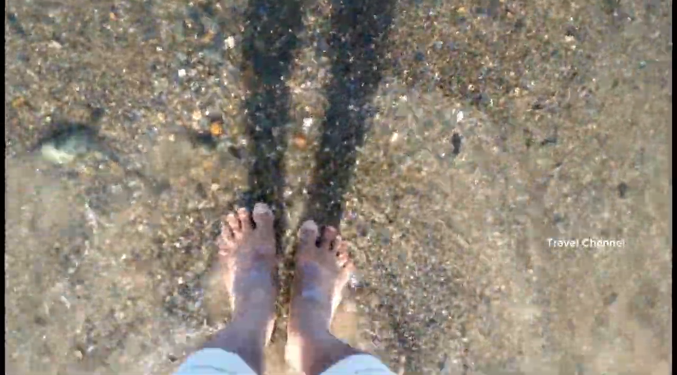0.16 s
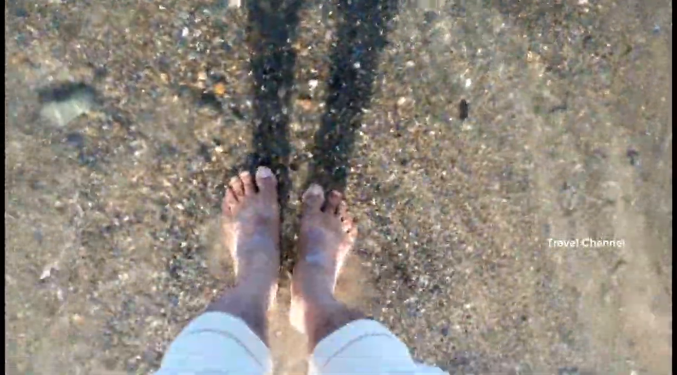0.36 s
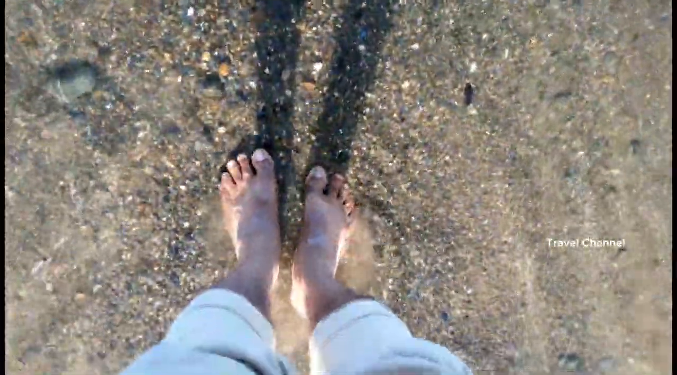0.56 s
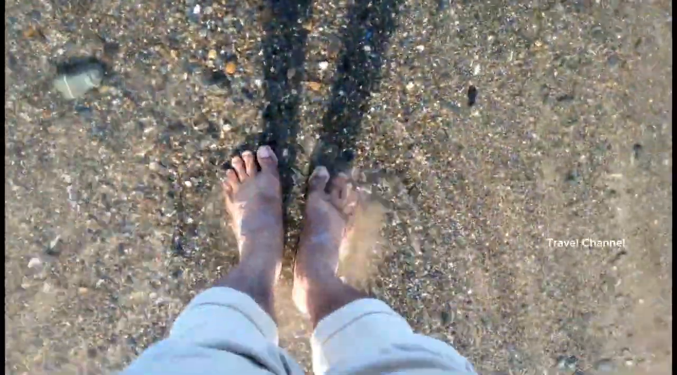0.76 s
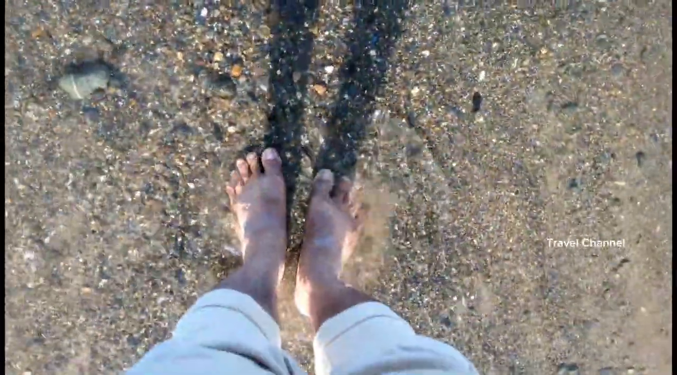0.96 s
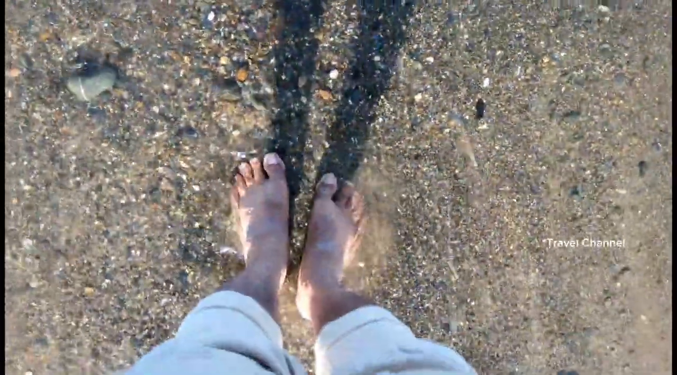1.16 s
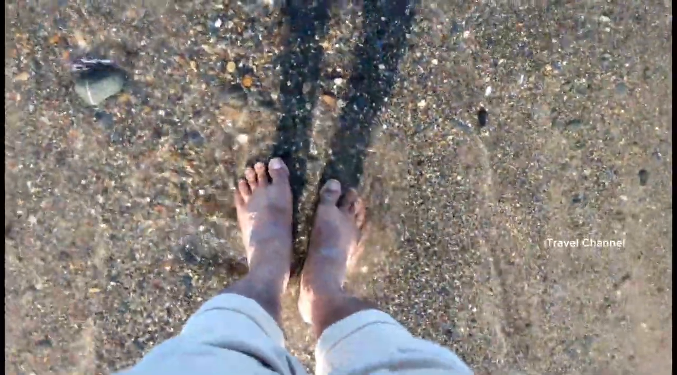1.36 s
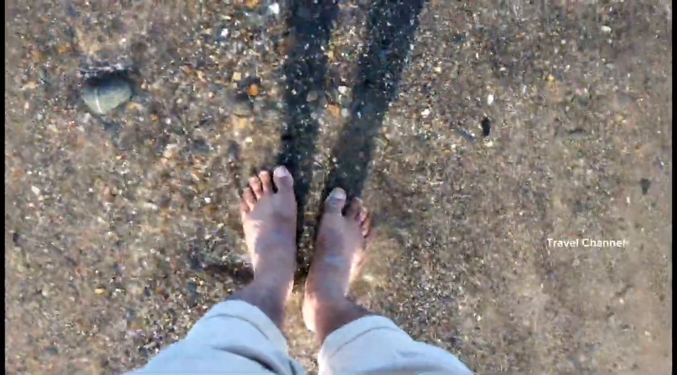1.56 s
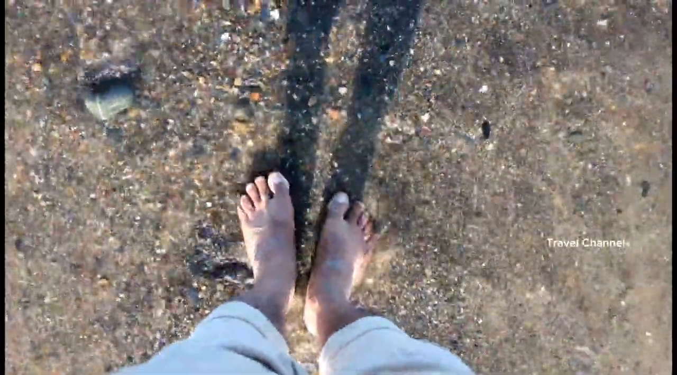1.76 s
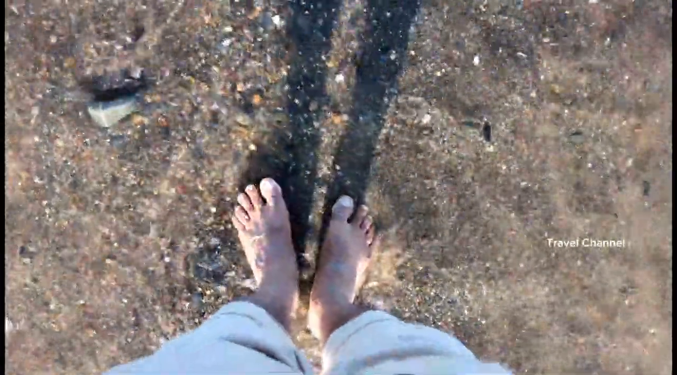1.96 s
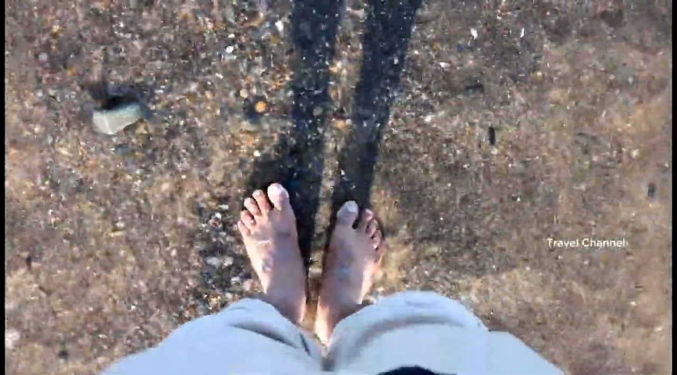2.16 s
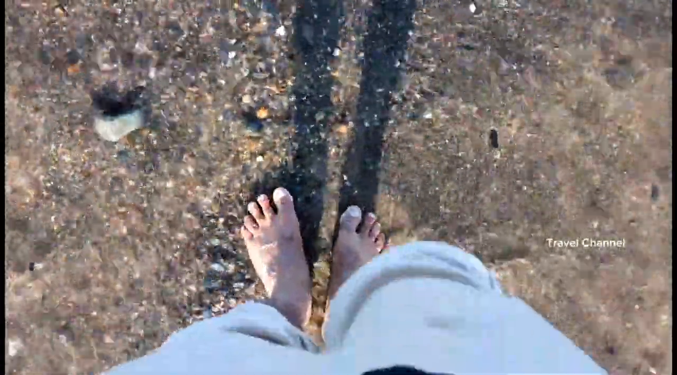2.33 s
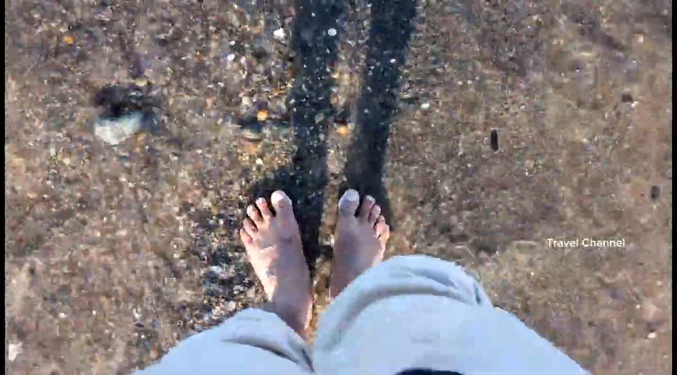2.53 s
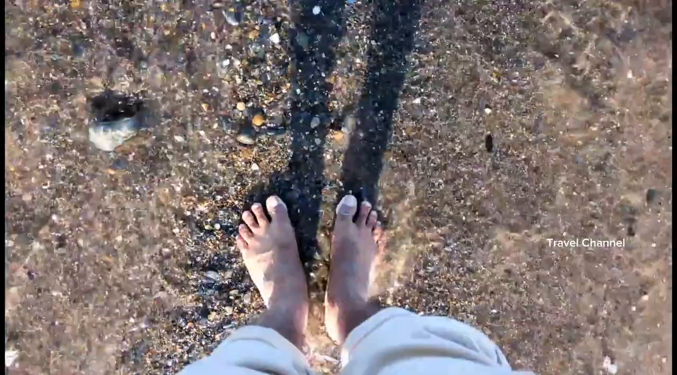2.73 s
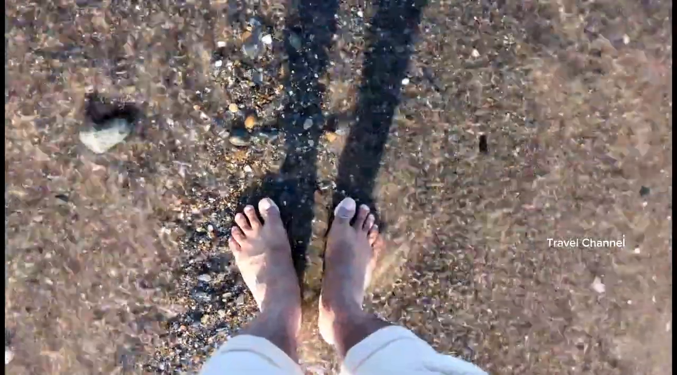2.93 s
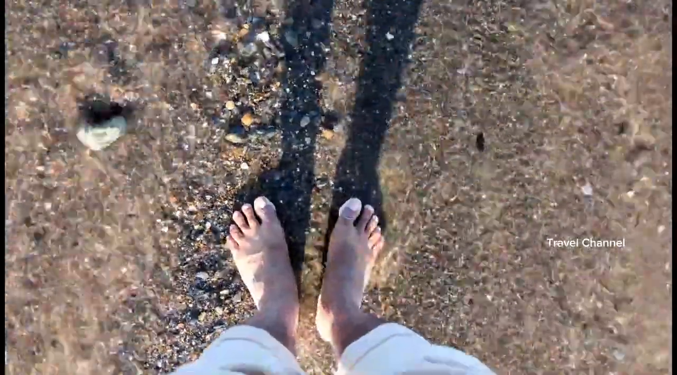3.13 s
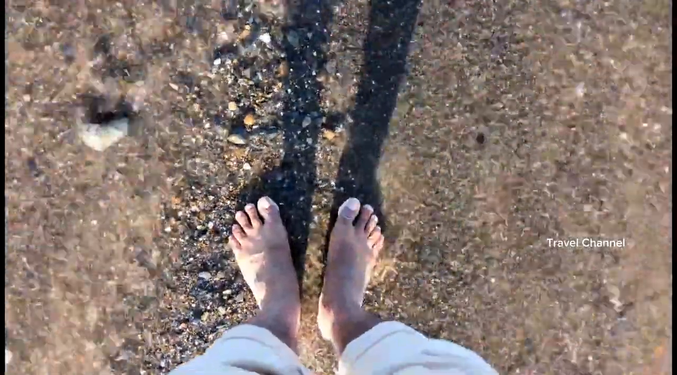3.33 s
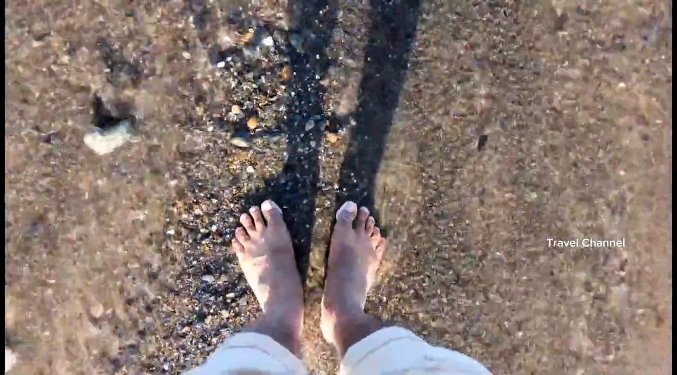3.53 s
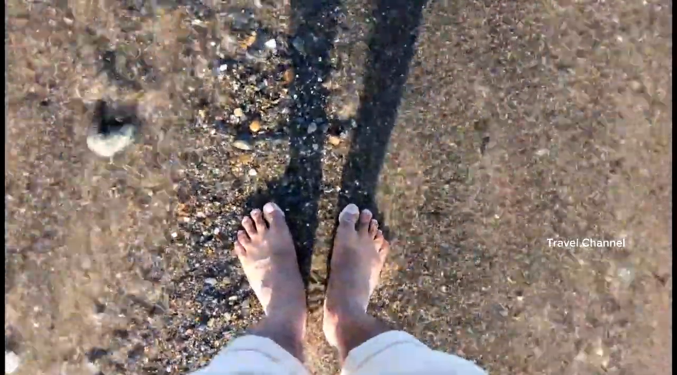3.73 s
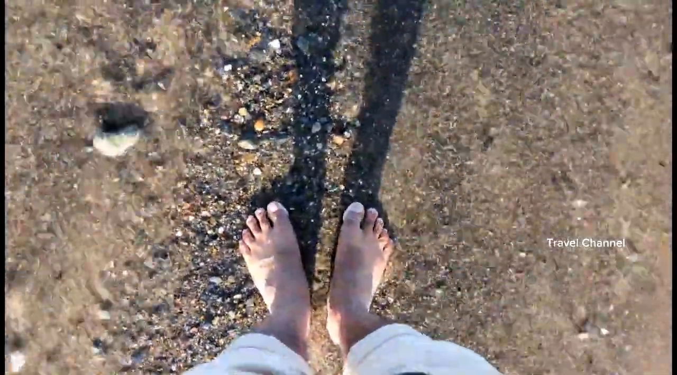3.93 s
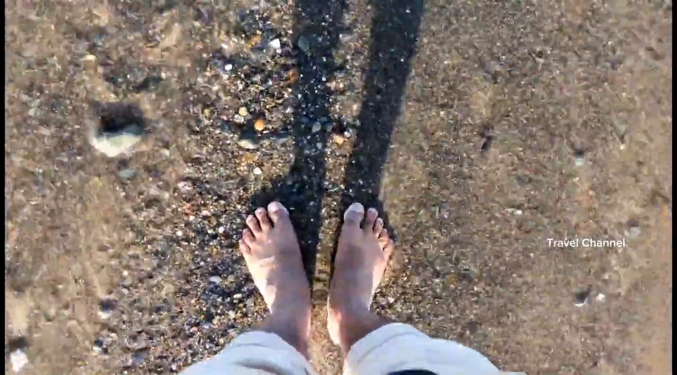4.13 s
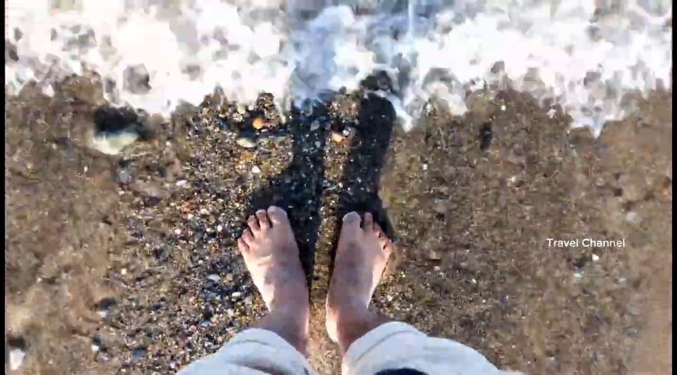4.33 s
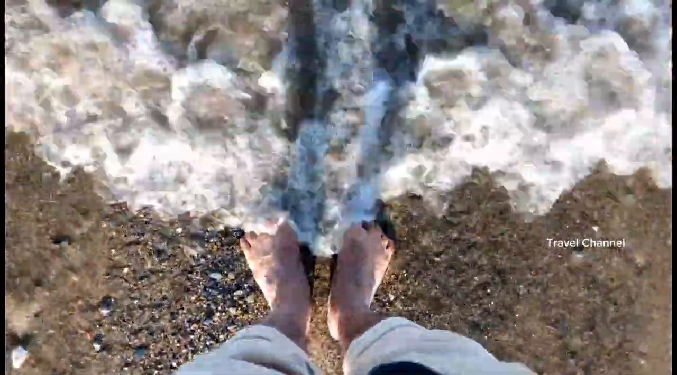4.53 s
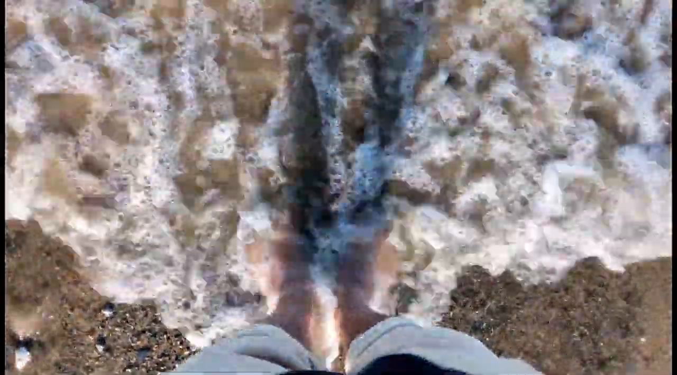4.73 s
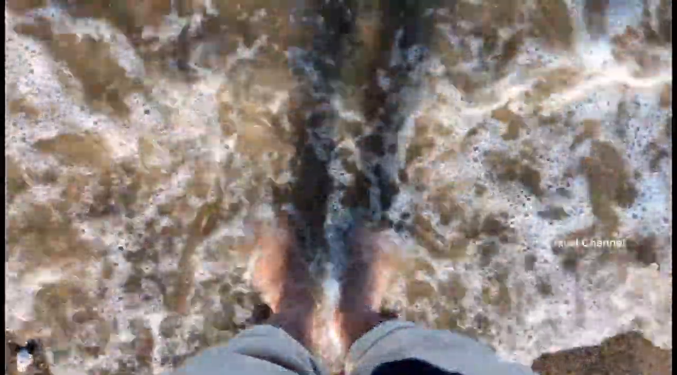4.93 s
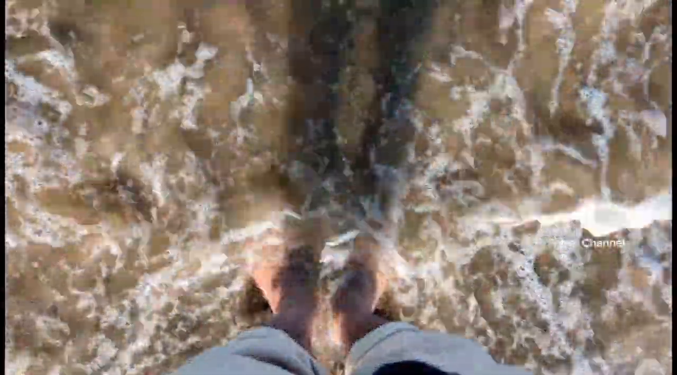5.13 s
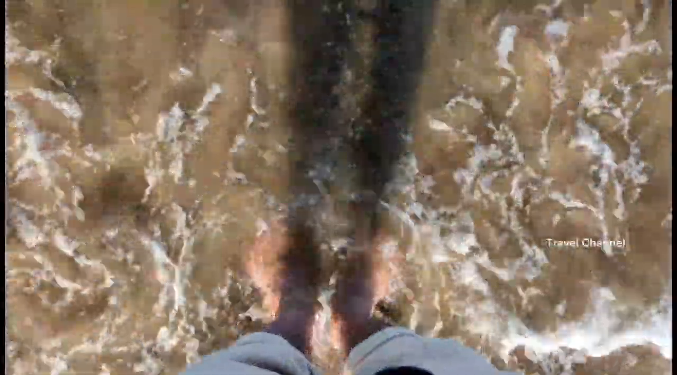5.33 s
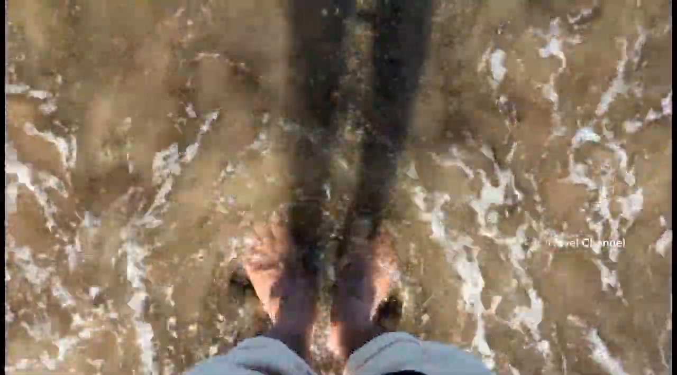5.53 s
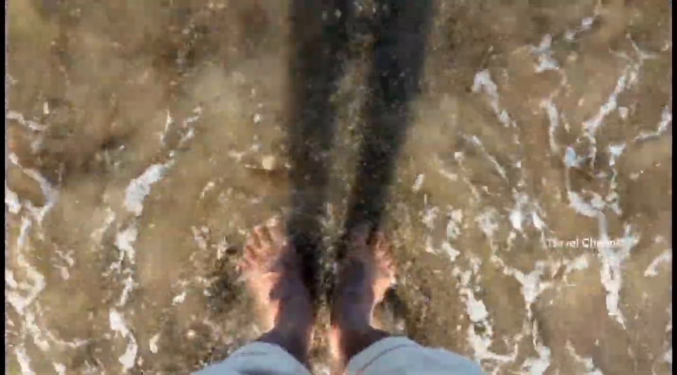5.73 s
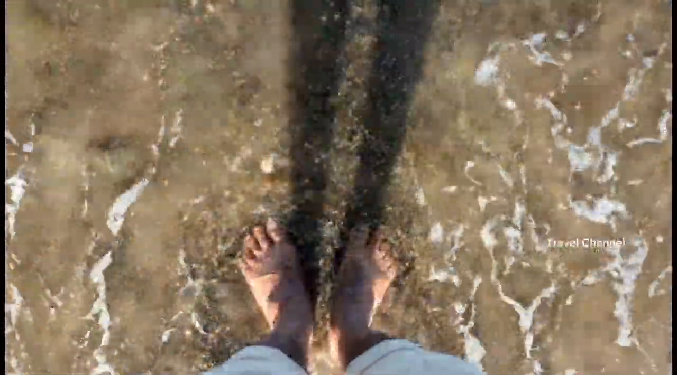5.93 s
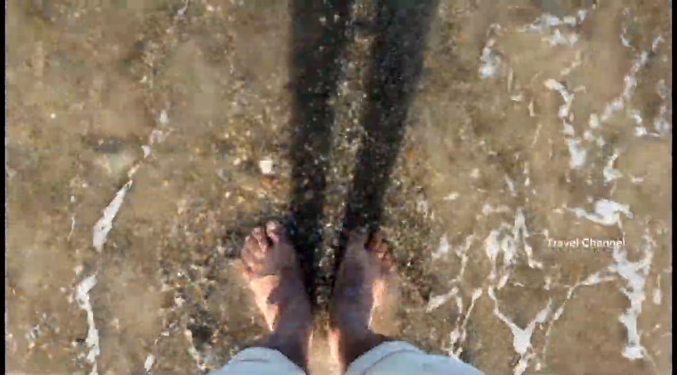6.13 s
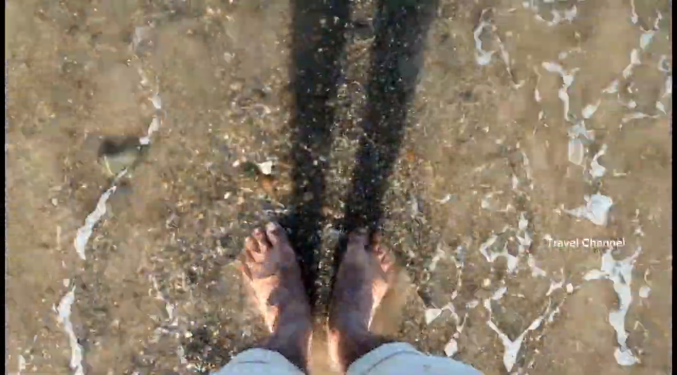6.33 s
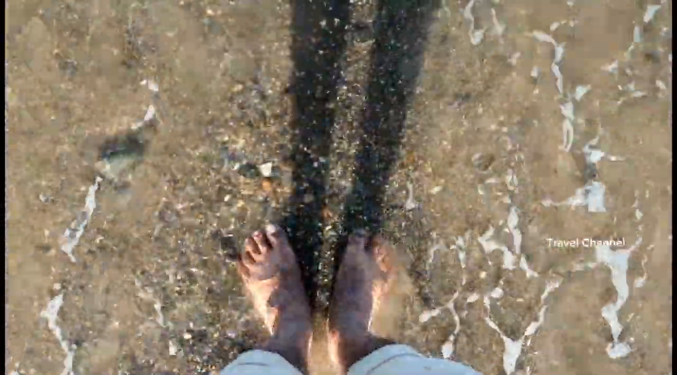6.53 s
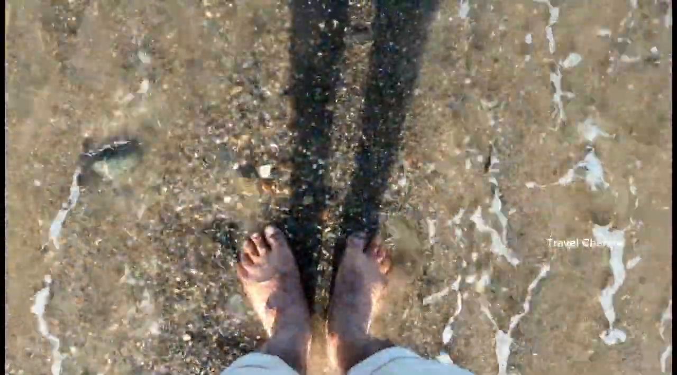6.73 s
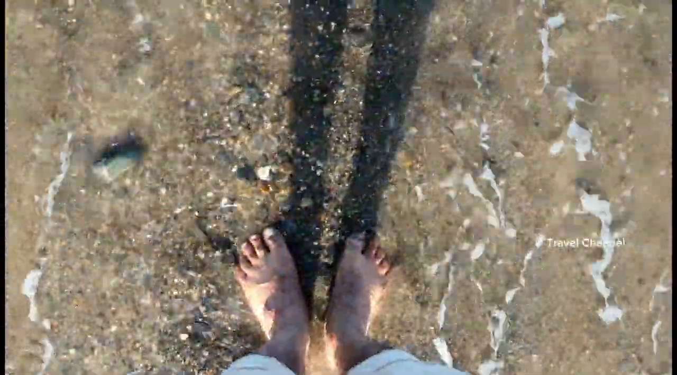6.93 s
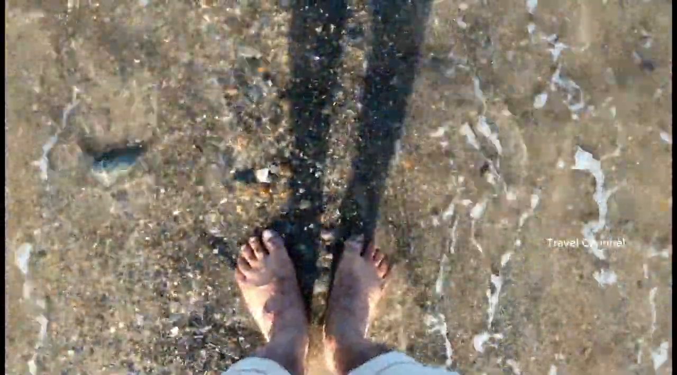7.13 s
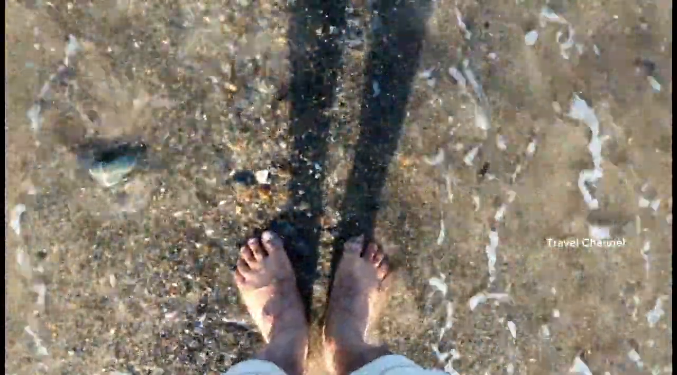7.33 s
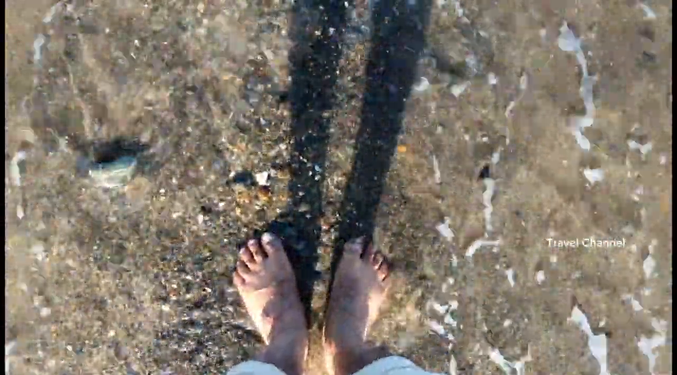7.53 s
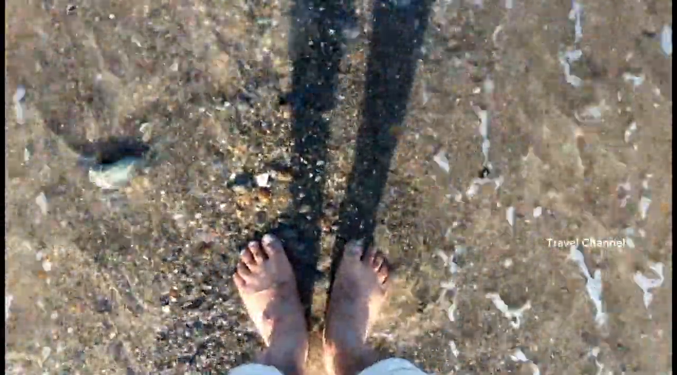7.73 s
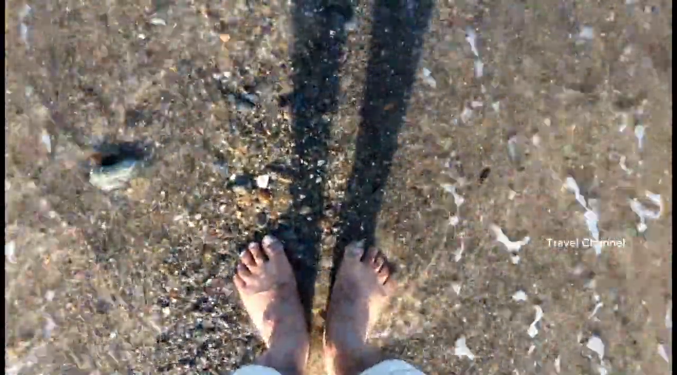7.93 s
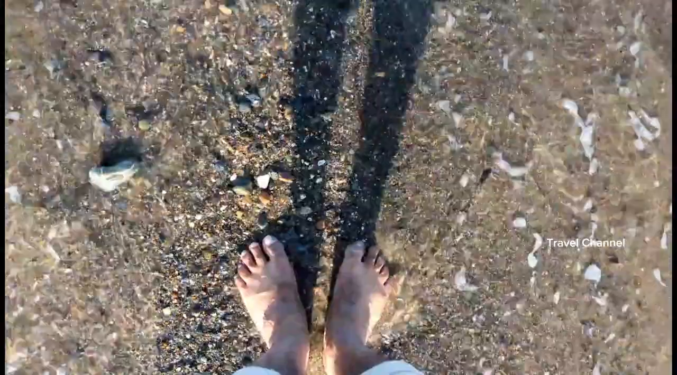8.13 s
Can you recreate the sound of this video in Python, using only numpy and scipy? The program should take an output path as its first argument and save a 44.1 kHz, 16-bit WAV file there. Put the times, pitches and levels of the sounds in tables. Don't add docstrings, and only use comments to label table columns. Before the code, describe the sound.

Soft surf murmurs along the shore, brighter on the left, with light hiss. Low wind gusts bump first the left, then the right microphone, followed by sparse crisp pops and droplet ticks. A small wave suddenly breaks close by with hollow bubbling thuds and a broad splash, raking the shingle. Backwash gurgles and foam fizzes out, then quiet lapping remains. Outdoor, close handheld stereo pickup with muffled treble on the right.

```python
import sys
import numpy as np
from scipy import signal
from scipy.fft import rfft, irfft, next_fast_len
from scipy.io import wavfile
from scipy.ndimage import uniform_filter1d, map_coordinates

SR = 44100
rng = np.random.default_rng(int(sys.argv[2]) if len(sys.argv) > 2 else 0)


def voltage_ratio(decibels):
    exponent = np.asarray(decibels, float) / 20
    return 10 ** exponent


def bounce(signal):
    frames = np.transpose(np.atleast_2d(signal))
    limited = np.clip(frames, -1, 1)
    pcm = np.round(limited * 32767).astype(np.int16)
    wavfile.write(sys.argv[1], SR, pcm)


N = 364707

# (t/s, flow level/dB, foam level/dB)
SURGE = [(0, -47.5, -65), (.5, -48, -64.5), (1.3, -51.5, -70.5), (2.15, -47, -70), (2.7, -50, -68.5),
         (3.42, -54, -64.5), (3.655, -37.5, -48.5), (3.69, -35, -39), (3.87, -29, -38), (4.07, -27.5, -38),
         (4.39, -31.5, -42.5), (4.64, -38.5, -50.5), (5.16, -42.5, -59.5), (6.0, -45.5, -65),
         (6.84, -43.5, -67.5), (7.3, -48.5, -68), (7.75, -46.5, -66.5), (8.27, -45.5, -70)]
LOUD_FLOW_DB, LOUD_FOAM_DB = -27, -38


def unit(x):
    return x / np.sqrt(np.mean(x ** 2) + 1e-20)


def along(points, hz):
    f, v = np.transpose(points)
    return np.interp(np.log(hz + 1), np.log(f + 1), v)


def curves(rows):
    s, *cols = np.transpose(rows)
    return [np.interp(np.arange(N) / SR, s, c) for c in cols]


def wobble(rate):
    knots = rng.standard_normal(int(N * rate / SR) + 4)
    return map_coordinates(knots, [np.arange(N) * rate / SR])


def quiver(rate):
    w = wobble(rate)
    return w - uniform_filter1d(w, size=SR // 8)


def together(*gains):
    return np.sqrt(sum(g ** 2 for g in gains))


def bumps(rows, width):
    t = np.arange(0, N / SR + .01, .005)
    level = together(*[voltage_ratio(db) * np.exp(-.5 * ((t - s) / width) ** 2) for s, db in rows])
    return np.interp(np.arange(N) / SR, t, level)


def filtered(x, response):
    m = next_fast_len(N + 8192)
    return irfft(rfft(x, m) * response(np.fft.rfftfreq(m, 1 / SR)), m)[..., :N]


def add(out, s, sound):
    start = round(s * SR)
    piece = out[..., start:start + sound.shape[-1]]
    piece += sound[..., :piece.shape[-1]]


def aside():
    # (t/s, t/s)
    seaward = (1.38, 7.3)
    t, turn_s = np.arange(N) / SR, .008
    to_sea, back = [np.clip((t - s) / turn_s, 0, 1) for s in seaward]
    return 1 - to_sea + back


def rush(spectrum, lo_hz, hi_hz, patchy_db, grain_db=0):
    # (f/Hz, likeness 0-1)
    likeness = [(60, 0.96), (160, 0.95), (300, 0.98), (500, 0.81), (800, 0.72), (1300, 0.12), (2200, 0.057),
                (3500, .02)]
    grains = voltage_ratio(grain_db * rng.standard_normal(N // 40 + 1).repeat(40)[:N])
    z = signal.stft(rng.standard_normal((2, N)) * grains, nperseg=512)[2]
    patches = rng.standard_normal(z.shape[1:])
    patches = uniform_filter1d(uniform_filter1d(patches, 6, 0), 10, 1)
    pair = signal.istft(z * voltage_ratio(patchy_db * unit(patches)), nperseg=512)[1][:, :N]

    def band(hz):
        edges = (1 + (lo_hz / (hz + 1)) ** 8) * (1 + (hz / hi_hz) ** 8)
        return voltage_ratio(along(spectrum, hz)) / np.sqrt(edges)

    def spread(hz):
        angle = np.arccos(np.clip(along(likeness, hz), 0, 1)) / 2
        return band(hz) * [np.cos(angle), np.sin(angle)]

    mid, side = filtered(pair, spread)
    return unit(np.array([mid + side, mid - side]))


def bubble(hz, t60, rise):
    t = np.arange(int(t60 * SR) + 8) / SR
    phase = 2 * np.pi * hz * (t + rise * t * t / t60)
    return np.sin(phase) * voltage_ratio(-60 * t / t60) * (1 - np.exp(-t * hz / 0.81))


def swarm(count, lo_hz, span, cycles, during=(0, N / SR)):
    out = np.zeros((2, N))
    for when, pitch, size, side in rng.random((count, 4)):
        hz = lo_hz * span ** pitch
        s = during[0] + when * (during[1] - during[0])
        level = voltage_ratio(-4 * np.log(size + 0.083) + [[5 * side], [-5 * side]])
        add(out, s, level * bubble(hz, cycles / hz, 0.24))
    return unit(out)


def shore():
    # (t/s, level/dB)
    surf_levels = [(0, -50), (1, -48), (1.45, -53), (2.5, -48), (3.3, -51.5), (4, -33.5), (5, -48.5),
                   (6, -54.5), (7.28, -51), (7.31, -45), (7.6, -48), (7.95, -48.5), (8.27, -51)]
    # (f/Hz, level per Hz/dB)
    surf_colour = [(250, -17), (500, -1), (950, 2.5), (1400, -2), (2100, -15), (2600, -20)]
    # (f/Hz, level per Hz/dB)
    ribs = [(2600, -4), (3500, -1), (4200, -12), (5000, -12), (5700, -6), (6050, -12), (6500, -2),
            (7100, -15), (7700, -3), (8300, -20), (10000, -28), (14000, -50)]
    usual_db, seaward_db, aside_db = -49, -22, -8.5
    early_db = -6.5
    split_hz, right_lag = 2600, 24

    body_db, = curves(surf_levels)
    early = np.arange(N) < N // 2
    facing_db = seaward_db + (aside_db - seaward_db + early_db * early) * aside()
    hiss_db = usual_db + 0.6 * (body_db - usual_db) + facing_db

    def colours(hz):
        low = along(surf_colour, hz) - 120 * (hz > split_hz)
        high = along(ribs, hz) - 120 * (hz < split_hz)
        return voltage_ratio([low, high])

    body, hiss = filtered(rng.standard_normal((2, N)), colours)
    surf = voltage_ratio(body_db + 1.5 * wobble(11)) * unit(body)
    surf = surf + voltage_ratio(hiss_db + 1.2 * wobble(14)) * unit(hiss)
    return np.array([surf, voltage_ratio(5.0) * np.roll(surf, right_lag)])


def wave():
    # (f/Hz, level per Hz/dB)
    tumbling = [(80, -11.5), (150, -5), (300, -2), (600, -1.5), (950, -6.5), (1400, -6), (2000, -7.5),
                (2600, -15), (3500, -16.5), (4200, -23.5)]
    # (t/s, thud level/dB)
    plunges = [
        (3.83, -34.5),
        (4.15, -39),
        (0.485, -50),
        (4.9, -54),
        (7.68, -55),
        (8.2, -52),
    ]
    # (t/s, level against the flow/dB)
    run_up = [
        (4.08, -2),
    ]
    roar_db, foam_db = curves(SURGE)
    flow, froth = roar_db - LOUD_FLOW_DB, foam_db - LOUD_FOAM_DB
    thud_db = -35.5 + 1.024 * flow
    wash_db = -28.5 + 1.086 * flow - 5 * aside()
    splash_db = -32 + 0.51 * flow + 0.54 * froth
    raking = together(1.0, bumps(run_up, width=0.038))
    heave = together(voltage_ratio(thud_db), bumps(plunges, width=0.04))
    surge = wobble(12)
    thud = heave * voltage_ratio(2.5 + 2.0 * surge) * rush(tumbling, 103, 248, patchy_db=0.94)
    roar = voltage_ratio(roar_db + 3.0 + 0.064 * surge) * rush(tumbling, 278, 824, patchy_db=1.15)
    wash = voltage_ratio(wash_db + 4.0 + 0.23 * surge) * rush(tumbling, 907, 1390, patchy_db=1.5, grain_db=1.5)
    splash = voltage_ratio(splash_db + 4.5 + 0.46 * surge) * rush(tumbling, 1810, 5070, patchy_db=1.5, grain_db=1.5)
    large_bubbles = voltage_ratio(wash_db - 18.5) * swarm(count=220, lo_hz=942, span=2.63, cycles=44)
    return thud + roar + raking * (wash + splash) + large_bubbles


def foam():
    # (f/Hz, level per Hz/dB)
    foam_colour = [(3500, -4), (4200, -7), (5500, -1), (7000, -3), (8200, -5), (9500, -6), (10500, -2),
                   (12800, -2), (13600, -4), (14100, -8), (14900, -10), (15800, -8)]
    # (t/s of most bursting, level/dB)
    leftover = [
        (0.0, -71),
        (5.08, -52),
    ]
    # (t/s, level/dB)
    trickle = [(2.4, -88), (2.75, -84), (3.45, -78), (3.7, -55), (4.3, -52), (4.7, -62), (6.5, -80)]
    gather_db_per_s, fade_db, fade_s = 28, 25.5, 0.88
    spray_db, t = curves(SURGE)[1], np.arange(N) / SR
    late = []
    for s, db in leftover:
        gather = gather_db_per_s * np.maximum(s - t, 0)
        fade = fade_db * (1 - np.exp(-np.maximum(t - s, 0) / fade_s))
        late.append(voltage_ratio(db - gather - fade))
    fresh = voltage_ratio(-38.5 + 1.47 * (spray_db - LOUD_FOAM_DB))
    bursting = together(fresh, *late)
    sputter = wobble(6.8)
    spray = voltage_ratio(spray_db + 4.5 + 0.37 * sputter) * rush(foam_colour, 2500, 8900, patchy_db=1.0, grain_db=1.0)
    fizz = bursting * voltage_ratio(9 + .3 * sputter) * rush(foam_colour, 6300, 17400, patchy_db=.4, grain_db=1.2)
    tiny_bubbles = swarm(count=400, lo_hz=4020, span=2.9, cycles=15, during=(2.4, 6.0))
    return spray + fizz + voltage_ratio(curves(trickle)[0]) * tiny_bubbles


def boom():
    # (t/s, peak level/dB)
    throbs = [(0.0, -58), (.5, -56), (1.1, -69), (1.5, -62), (1.75, -53), (2.25, -55), (2.98, -65),
              (3.6, -53.5), (4.0, -60), (4.72, -57), (5.3, -58), (5.5, -57), (5.85, -55), (6.33, -55),
              (6.84, -55.5), (7.25, -58), (7.81, -61)]
    turns = np.cumsum(54 + 2.62 * wobble(9.5)) / SR
    level = together(voltage_ratio(-66), bumps(throbs, width=0.11))
    return level * voltage_ratio(6.5 + 1.6 * wobble(8.5)) * np.sin(2 * np.pi * turns)


def wind():
    # (t/s, level/dB)
    breeze_levels = [(0, -62), (.41, -62), (1.45, -65.5), (1.98, -54), (2.5, -60), (3.31, -66), (3.78, -58),
                     (4.17, -70), (4.63, -60), (5.85, -62.5), (7.0, -61.5), (7.67, -59), (8.0, -67),
                     (8.27, -53)]
    # (f/Hz, level per Hz/dB)
    buffet = [(20, -20), (35, -5), (50, 5), (80, 12), (120, 4), (250, -30), (900, -120)]
    # (t/s, peak level/dB, f/Hz, width/s)
    left_gusts = [(0.449, -37, 70, 0.038), (0.552, -39, 67, 0.018), (1.4, -38, 62, 0.018),
                  (1.546, -27, 80, 0.014), (1.652, -27, 70, 0.033), (1.69, -38.5, 56, .05),
                  (1.795, -43, 72, 0.02), (1.933, -39, 64, 0.04), (2.09, -42, 62, 0.045),
                  (2.185, -33, 64, 0.014), (2.332, -30, 70, 0.0095), (2.371, -29.5, 75, .013),
                  (2.415, -34, 58.7, 0.067), (2.485, -29, 76, 0.023), (2.567, -43, 74, 0.015)]
    # (t/s, peak level/dB, f/Hz, width/s)
    right_gusts = [
        (1.85, -45, 54, 0.035),
        (2.193, -40, 77, 0.013),
        (2.27, -42, 85, .04),
        (2.826, -19.5, 69, 0.012),
        (2.87, -34, 70, .008),
        (2.89, -38, 78, 0.017),
        (4.967, -41.5, 68, 0.023),
        (7.317, -40, 54, 0.026),
        (7.352, -42, 54, 0.012),
    ]
    # (port 0 left 1 right, t/s, peak level/dB, f/Hz)
    flutter = [(0, 0.44, -44, 129), (0, 1.62, -24, 111), (0, 1.643, -29, 125), (0, 1.6, -37, 110),
               (0, 2.45, -33, 128), (0, 5.53, -36, 115), (0, 8.1, -44, 122), (1, 2.74, -35.5, 90),
               (0, 2.285, -31, 235), (1, 2.787, -32, 83), (1, 2.806, -35, 540), (1, 2.809, -24.5, 213),
               (1, 2.853, -30, 91), (1, 6.792, -43, 112)]
    port_hz, port_width_hz, port_ring_db = 54, 12, 5

    lumps = np.array([wobble(11), wobble(7.1)])
    breeze = filtered(rng.standard_normal((2, N)), lambda hz: voltage_ratio(along(buffet, hz)))
    breeze = voltage_ratio(curves(breeze_levels)[0] + 3.5 + 3.0 * lumps) * unit(breeze)
    edge = unit(filtered(rng.standard_normal(N), lambda hz: hz / 130 / (1 + (hz / 130) ** 3)))
    half = SR // 8
    t = np.arange(-half, half) / SR
    thumps = np.zeros((2, N))
    gusts = [(0, *g) for g in left_gusts] + [(1, *g) for g in right_gusts]
    gusts += [(*f, 1.44 / f[-1]) for f in flutter]
    for port, s, db, hz, width in gusts:
        swell = np.exp(-.5 * (t / (0.35 * width + 0.00087)) ** 2)
        swing = np.sin(2 * np.pi * hz * t + 2 * np.pi * rng.random())
        rough = 0.16 * edge[round(s * SR) - half:][:len(t)]
        add(thumps[round(port)], s - 1 / 8, voltage_ratio(db + 1.0) * swell * (swing + rough))

    def port_ring(hz):
        damping = 1j * hz * port_width_hz
        return 1 + voltage_ratio(port_ring_db) * damping / (port_hz ** 2 - hz * hz + damping)

    return breeze + filtered(thumps, port_ring)


def pops():
    # (t/s, peak level/dB, f/Hz, extra level on the right/dB)
    single_bubbles = [(.118, -31.5, 1500, 9), (.12, -42, 3100, 0), (.305, -31, 425, -4), (.36, -37, 970, 8),
                      (1.715, -30.5, 1400, -5), (1.716, -37, 1750, -3), (3.89, -19, 1210, 2),
                      (3.74, -27, 2550, 2), (2.052, -45, 6100, 0), (2.630, -29, 6130, -8),
                      (2.93, -47, 7600, 0), (3.046, -38, 6400, -4), (3.051, -44, 6600, 0),
                      (3.2306, -42, 3730, -2), (3.4356, -39, 6600, 0), (3.45, -38, 1970, 5),
                      (3.495, -34.5, 795, -2), (3.515, -43, 3200, -3), (3.53, -36, 2020, 7),
                      (3.575, -24, 308, 3.5), (3.62, -30, 2350, 4), (3.72, -24, 2800, 4),
                      (3.835, -11, 323, -3), (3.94, -9, 290, 0), (4.535, -23, 5780, -16),
                      (4.875, -32, 2330, 4), (5.346, -37, 3100, -3), (7.765, -24, 392, -2),
                      (3.69, -15, 203, 2), (3.795, -12, 175, 1), (3.822, -14, 310, 2), (3.912, -16, 261, 2),
                   (3.98, -15, 394, 2), (4.037, -13, 397, 2), (4.055, -12.5, 225, 3), (4.05, -15, 845, 5),
                   (4.112, -11, 285, 4), (4.016, -26, 2160, 3), (4.073, -21, 2150, 3),
                   (4.379, -23, 2170, 3), (4.42, -25, 610, 2), (4.477, -29, 2350, 3), (4.512, -22, 534, 2),
                   (4.5125, -26, 2270, 3), (4.563, -36, 1950, 0), (4.615, -28, 673, 2),
                   (4.662, -37, 2080, 3), (4.696, -37, 2230, 3), (4.738, -38, 2250, 3),
                   (4.993, -38, 2110, 3), (5.08, -39, 2390, 3), (5.279, -41, 2410, 3),
                   (2.951, -42, 2600, 0), (2.976, -45, 2500, 0), (3.065, -47, 3200, 0)]
    # (t/s, peak level/dB, f/Hz, pitch rise 0-1, extra level on the right/dB)
    drips = [(2.7023, -43, 4970, .1, -4), (2.722, -27, 5700, 0.42, -13), (2.778, -41, 1550, .3, 0),
             (2.9396, -30.5, 2300, 0.12, 1), (3.031, -48, 2644, .05, 0), (3.3667, -37.5, 2470, .05, -3),
             (3.71, -13.5, 368, 0.07, -1), (3.784, -13, 1284, 0.02, 2), (5.75, -35, 148, 0.07, 2),
             (6.07, -36, 1980, 0, -3), (7.94, -40, 3250, 0.2, -11)]
    # (t/s, peak level/dB, f/Hz)
    snaps = [(0.1058, -39, 5850), (2.6263, -41, 6260), (2.633, -29.5, 6740), (2.9023, -46, 4090),
             (2.9386, -45, 4280), (2.9444, -45, 4800), (2.9861, -47, 6670), (3.1303, -57, 4500),
             (3.2066, -60, 5910), (3.2265, -44, 5700), (3.253, -49, 6620), (3.3169, -54, 9500),
             (3.3268, -52, 4720), (3.3662, -43, 6350), (3.3912, -56, 5930), (3.5387, -40, 5800),
             (3.5598, -33, 6220), (3.6087, -46, 5990), (4.1599, -22, 10500), (4.332, -13.5, 10500),
             (4.875, -37, 5990), (5.3454, -44, 12700), (7.2858, -51, 7400)]
    out, t = np.zeros((2, N)), np.arange(200) / SR
    rows = [(s, db, hz, 0.077, right_db, 1) for s, db, hz, right_db in single_bubbles]
    rows += [(*d, 1.73) for d in drips]
    for s, db, hz, rise, right_db, longer in rows:
        t60 = longer * (1 - rise) * 0.022 * (hz / 1000) ** -0.43
        add(out, s, voltage_ratio(db + np.array([[3], [0.5 + right_db]])) * bubble(hz, t60, rise))
    for s, db, hz in snaps:
        ring = np.sin(2 * np.pi * hz * t) * voltage_ratio(-60 * t / 0.0035) * (1 - np.exp(-t / .0003))
        treble = signal.butter(3, [.8 * hz, min(2.2 * hz, 15000)], "bandpass", fs=SR, output="sos")
        burst = signal.sosfilt(treble, rng.standard_normal(len(t)) * voltage_ratio(-60 * t / 0.0016))
        add(out, s, voltage_ratio(db + 7.5) * (ring + 0.71 * burst))
    return out


def hand():
    # (t/s, level/dB, width/s)
    rubs = [
        (2.0, -62, 0.03),
        (2.12, -74, .015),
        (3.39, -64, .012),
    ]
    t = np.arange(N) / SR
    skin = unit(filtered(rng.standard_normal(N), lambda hz: hz / 4500 / (1 + (hz / 4500) ** 4)))
    level = sum(voltage_ratio(db) * np.exp(-.5 * ((t - s) / width) ** 2) for s, db, width in rubs)
    return [[0], [1]] * skin * level


def ticks():
    # (t/s, peak level/dB, lowest f/Hz, highest f/Hz)
    tick_rows = [(2.7487, -52, 6000, 8000), (2.7782, -48, 3500, 7000), (2.8036, -56, 5000, 7500),
                 (2.9383, -43, 4800, 15000), (2.9444, -46, 7000, 14000), (2.9505, -48, 4500, 8500),
                 (2.964, -50, 4500, 6500), (2.9857, -42, 4500, 12000), (3.067, -49, 9000, 12000),
                 (3.075, -49, 5000, 7000), (3.1304, -46, 4000, 11000), (3.143, -52, 5500, 7000),
                 (3.173, -48, 7500, 12000), (3.178, -52, 5000, 7000), (3.183, -51, 7500, 8800),
                 (3.2531, -47, 5000, 11000), (3.268, -46, 6000, 8000), (3.272, -47, 2000, 12000),
                 (3.309, -49, 10000, 13000), (3.3269, -38, 4200, 10500), (3.367, -39, 8500, 12500),
                 (3.395, -37, 2000, 6000), (3.413, -51, 6000, 12000), (3.468, -46, 9500, 11500),
                 (3.486, -45, 7000, 14000), (3.5215, -41, 6000, 8000), (3.537, -42, 8500, 13000),
                 (3.615, -38, 6000, 10000), (4.597, -32, 6000, 8500), (4.745, -39, 5500, 7500)]
    out, t = np.zeros((2, N)), np.arange(260) / SR
    for s, db, lo_hz, hi_hz in tick_rows:
        spit = rng.standard_normal(len(t)) * voltage_ratio(-60 * t / .003)
        band = signal.butter(2, [lo_hz, min(hi_hz, 15500)], "bandpass", fs=SR, output="sos")
        click = signal.sosfilt(band, spit)
        add(out, s, voltage_ratio(db + 1.5) * click[None] / np.abs(click).max())
    return out


def crackle():
    flow_db, foam_db = curves(SURGE)
    gurgle = swarm(count=150, lo_hz=1700, span=1.8, cycles=34, during=(3.38, 3.68))
    grains = swarm(count=600, lo_hz=4200, span=2.3, cycles=12, during=(3.55, 5.8))
    drain = swarm(count=260, lo_hz=1950, span=1.58, cycles=29, during=(4.0, 5.5))
    return voltage_ratio(-71) * gurgle + voltage_ratio(foam_db - 13) * grains + voltage_ratio(flow_db - 20) * drain


def scene():
    # (f/Hz, loss/dB)
    cover_loss = [(60, -3), (150, 2), (500, 3), (1200, 7), (2200, 0), (2700, 8.5), (4000, 10.5), (5500, 15),
                  (7000, 28), (9000, 27), (13000, 63), (15800, 43)]
    # (t/s, samples by which the right port hears it first)
    near_lead = [(0, -22), (3.62, -16), (3.75, -5), (4.0, 5), (4.4, 4), (4.9, -22), (8.27, -22)]
    height = np.clip(1 + (curves(SURGE)[1] - LOUD_FOAM_DB) / 14, 0, 1)
    near = wave() * voltage_ratio(1.1 * height * quiver(30))
    near = near + foam() * voltage_ratio(1.1 * height * quiver(22))
    lag = np.round(curves(near_lead)[0]).astype(int)
    near[0] = near[0][np.clip(np.arange(N) - lag, 0, N - 1)]
    water = shore() + near + pops() + ticks() + crackle()
    water[1] = filtered(water[1], lambda hz: voltage_ratio(-along(cover_loss, hz)))
    return water + wind() + boom() + hand()


def low_pass(x):
    return signal.sosfilt(signal.butter(12, 16290, fs=SR, output="sos"), x)


def record(dry):
    hiss = filtered(rng.standard_normal(dry.shape), lambda hz: 1 / (1 + (hz / 6000) ** 2))
    mix = filtered(dry + voltage_ratio([[-68], [-64]]) * hiss, lambda hz: hz < 15870)
    return low_pass(mix)


dry = scene()
out = record(dry)
bounce(out)
```